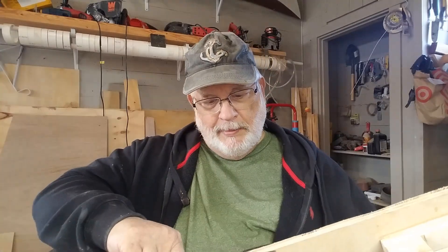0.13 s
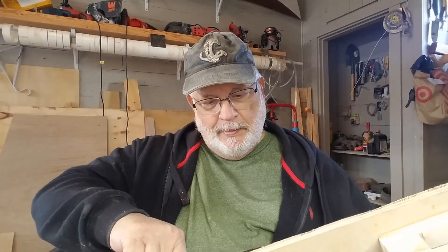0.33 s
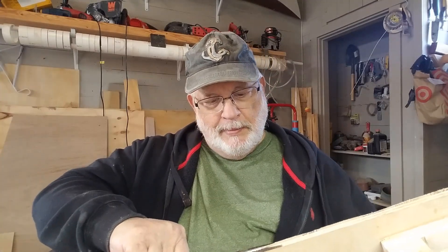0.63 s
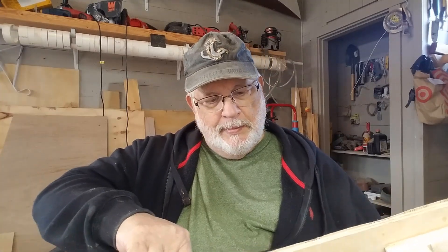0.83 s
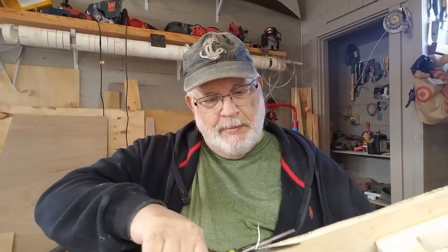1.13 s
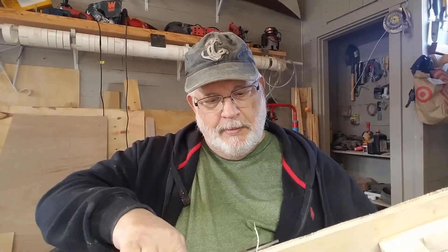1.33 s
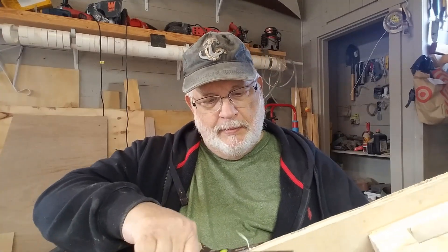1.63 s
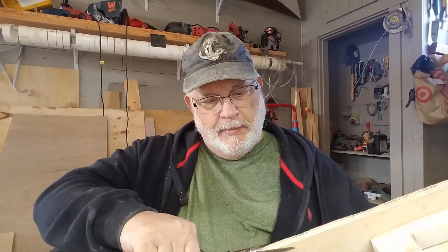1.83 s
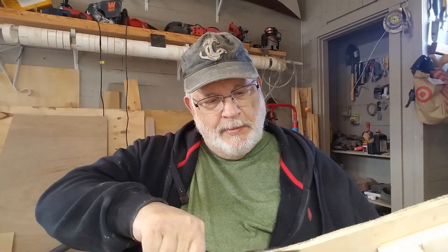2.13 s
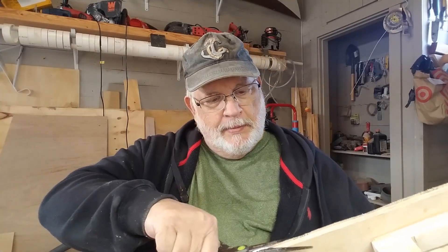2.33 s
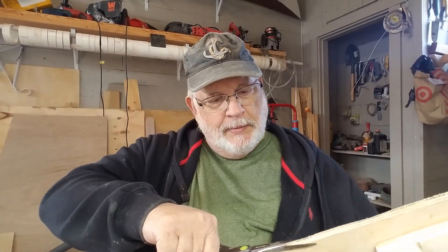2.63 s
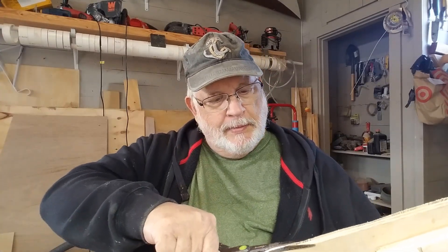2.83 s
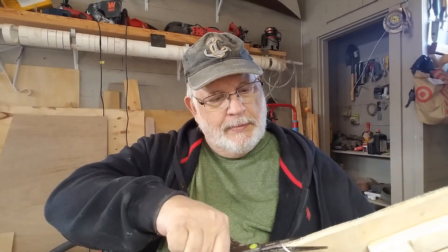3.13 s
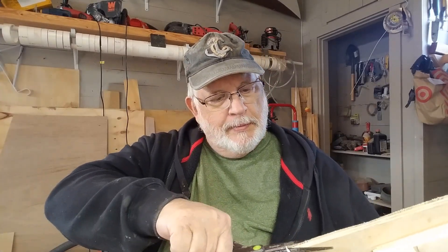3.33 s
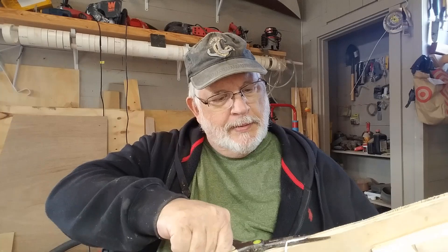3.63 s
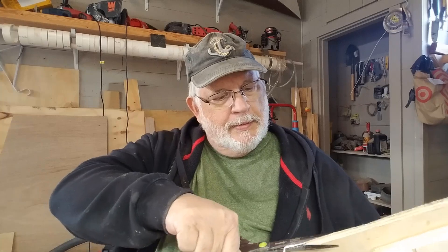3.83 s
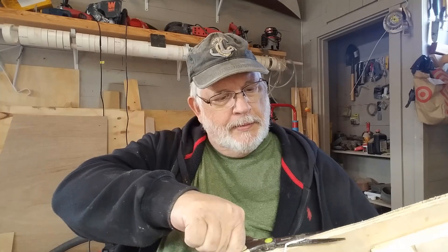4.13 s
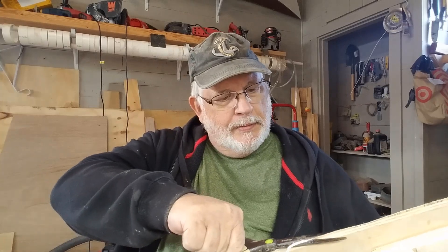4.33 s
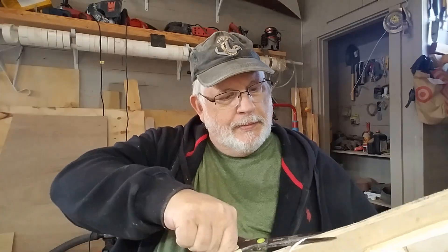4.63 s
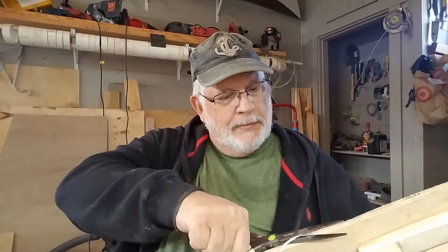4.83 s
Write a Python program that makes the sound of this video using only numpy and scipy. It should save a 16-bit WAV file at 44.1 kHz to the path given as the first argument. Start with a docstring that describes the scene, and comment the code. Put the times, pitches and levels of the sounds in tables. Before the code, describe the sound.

Scissors trim stiff sandpaper stuck to a wooden board. Sharp, brittle snaps come in irregular clusters, joined by short gritty rasps, tiny ticks and dull wooden knocks. A few steel blade clacks stand out. The cutting starts immediately, thins briefly, then turns denser and louder. Close stereo microphones in a small workshop catch a short, lively room tail over very faint low room air.

```python
"""Scissors cutting sandpaper on wood

Scissors trim the overhang of sandpaper stuck to a wooden board, in a small workshop.
The blades break through the grit in jerks: each snap is a burst of filtered noise for the crack,
and a sudden release that excites the decaying modes of the stiff sheet and of the board.
Between snaps a rain of tiny impulses makes the grinding; small ticks and clacks of steel join in.
Two microphone ports stand close by; the room's decaying noise rings for just under half a second."""
import sys
import numpy as np
from scipy import signal
from scipy.fft import rfft, irfft
from scipy.io import wavfile
from scipy.ndimage import uniform_filter1d

SR = 44100
rng = np.random.default_rng(int(sys.argv[2]) if len(sys.argv) > 2 else 0)


def wrap_up_sound(samples):
    """Save the sound to the file named by the first command line argument, as 16-bit audio."""
    columns = np.atleast_2d(samples).T
    # keep every value between -1 and 1, then stretch to whole-number steps
    tamed = np.clip(columns, -1, 1)
    steps = np.round(tamed * 32767).astype(np.int16)
    wavfile.write(sys.argv[1], SR, steps)


N = 219110  # samples


def amp(db):
    """Decibel law: the amplitude factor of a level in dB."""
    return 10 ** (np.asarray(db) / 20)


def read(points, hz):
    """Logarithmic frequency scale: straight lines between points on that axis."""
    f, value = np.transpose(points)
    return np.interp(np.log(hz + 1), np.log(f + 1), value)


def unit(x):
    """Energy normalisation: scales a sound to a mean energy of one per channel."""
    return x / np.sqrt(np.mean(np.sum(x ** 2, -1)) + 1e-20)


def add(mix, s, sound):
    """Superposition: mixes a two-channel sound in at time s, trimmed to the mix."""
    start = round(s * SR)
    sound = sound[:, max(-start, 0):]
    part = mix[:, max(start, 0):][:, :sound.shape[1]]
    part += sound[:, :part.shape[1]]


def play(events):
    """Superposition of events, each a time in seconds and its (delay s, sound) parts."""
    out = np.zeros((2, N))
    for s, parts in events:
        for delay, sound in parts:
            add(out, s + delay, sound)
    return out


def through(x, response):
    """Linear filtering: convolves an excitation with an impulse response."""
    return signal.fftconvolve(np.atleast_2d(x), np.atleast_2d(response), axes=1)


def colour(db_at, size=512):
    """Minimum phase: the causal impulse response that follows from the gain db_at(Hz)."""
    hz = abs(np.fft.fftfreq(size, 1 / SR))
    log_gain = np.log(amp(db_at(hz)))
    spectrum = np.exp(np.conj(signal.hilbert(log_gain)))
    return np.fft.ifft(spectrum).real[..., :size // 2]


def ring(modes, size=4096):
    """Modal synthesis: a sum of exponentially dying sines, given as (Hz, dB, t60 s)."""
    t = np.arange(size) / SR
    return sum(amp(db - 60 * t / max(t60, .001)) * np.sin(2 * np.pi * hz * t) for hz, db, t60 in modes)


def ports(x, shared):
    """Partial correlation: two unrelated signals become a pair with a shared part."""
    shared = np.clip(shared, 0, 1)
    return np.array([x[0], shared * x[0] + np.sqrt(1 - shared ** 2) * x[1]])


# Spectrum of the still room. Each row: frequency in Hz, relative density in dB per Hz.
STILL_AIR = [(20, 0.5), (64, -0.5), (108, 0.5), (200, -3.5), (400, -7.5), (1200, -16), (4000, -27),
             (15000, -25.5)]


def air(level_db=-62.5):
    """Shaped noise: the faint, low, stationary sound of the still room."""
    hz = np.fft.rfftfreq(N, 1 / SR)
    white = ports(rng.standard_normal((2, N)), shared=0.84)
    noise = irfft(rfft(white) * amp(read(STILL_AIR, hz)), N)
    return amp(level_db) * np.sqrt(N) * unit(noise)


# Late decay of the room. Each row: frequency in Hz, time to fall by 60 dB in s.
ROOM_DECAY = [(150, 0.46), (400, 0.3), (1000, 0.44), (2800, 0.4), (7000, 0.36), (15000, 0.26)]
# Strength of the reflections. Each row: frequency in Hz, level in dB against the direct sound.
ROOM_STRENGTH = [(100, -1), (400, -4.5), (1000, -5.5), (2500, -2), (7000, -3), (15000, -2)]


def workshop(x, first=0.0017, early_db=3, early_time=0.0088, apart_hz=1300):
    """Diffuse reverberation: dense reflections from bench and walls as dying noise.

    The close ports hear the same bass but different treble, parting around apart_hz."""
    size = SR * 3 // 4
    hz, t, noise = signal.stft(rng.standard_normal((3, 2, size)), SR, nperseg=256)
    shared = 1 / (1 + (hz[:, None] / apart_hz) ** 2)
    t60 = read(ROOM_DECAY, hz)[:, None]
    decay = amp(-60 * t / t60 + early_db * np.exp(-t / early_time))
    energy = size * np.mean(decay ** 2, 1, keepdims=True)
    decay *= amp(read(ROOM_STRENGTH, hz))[:, None] / np.sqrt(energy)
    # reflections fade in around the first delay (s)
    onset = np.clip(np.arange(size) / (first * SR) - .5, 0, 1)
    out = np.zeros((2, N))
    for k, pair in enumerate(noise):
        tail = signal.istft(ports(pair, shared) * decay, SR, nperseg=256)[1][:, :size] * onset
        # the reflections change as hand and scissors move: three tails trade places every 2 s
        turns = np.arange(N) / SR / 2 + k / 3
        place = np.sqrt(2 / 3) * np.cos(2 * np.pi * turns)
        out += through(x * place, tail)[:, :N]
    return out


# Spectrum of breaking grit. Each row: frequency in Hz, relative density in dB per Hz.
GRIT_SPECTRUM = [(300, -41), (900, -5.5), (1500, 3.5), (2400, 6.5), (3500, 2.5), (5500, 0), (7500, 2.5),
                 (9300, -5), (11000, -3.5), (13500, -2.5), (15700, -0.5), (16300, -30)]
# Balance of the grit between the ports. Each row: frequency in Hz, left minus right in dB.
GRIT_PORT_BALANCE = [(1000, -8.5), (2500, 1.5), (4000, 1), (6000, 3.5), (8300, -1), (10000, -4), (13000, 0),
                     (16000, 3)]


def grit_response(tilt_db, hz, hump_db=5.5, octaves=0.29):
    """Brittle fracture: short, bright sound of a grain at the two ports.

    The spectrum tilts by tilt_db per octave, with a broad hump (or dip) of hump_db around hz."""
    def gain_db(f):
        slope = tilt_db * np.log2(np.clip(f, 1500, 10000) / 5000)
        hump = hump_db * np.exp(-(np.log2((f + 1) / hz) / octaves) ** 2)
        balance = np.outer([.5, -.5], read(GRIT_PORT_BALANCE, f))
        return read(GRIT_SPECTRUM, f) + slope + hump + balance
    return colour(gain_db)


# Modes of the hand-damped steel blades. Each row: frequency in Hz, relative level in dB, t60 in s.
BLADE_MODES = [(903.7, -16, 0.058), (1177, -15, 0.013), (1510, -31, 0.078)]


def sheet_response(hz, cycles=10, blades_db=0, low_cut_hz=600):
    """Damped flexural mode: the free flap falls by 60 dB in a few cycles, beside the blades' modes.

    It is too small to radiate bass, hence the high-pass filter."""
    flap = ring([(hz, 0, cycles / hz)])
    modes = flap + amp(blades_db) * ring(BLADE_MODES)
    return signal.lfilter(*signal.butter(2, low_cut_hz, "high", fs=SR), modes)


# Modes of the board under the sheet. Each row: frequency in Hz, relative level in dB, t60 in s.
BOARD_MODES = [(219.7, -3, 0.047), (271, -17, 0.045), (356, -29.5, 0.087), (420, -5.5, 0.055),
               (483.4, -12.5, 0.13), (602, -15, 0.18), (630, -5.5, 0.023)]


def board_response(hz, t60=0.028, reach=0.15, far_db=6, low_cut_hz=330, top_hz=1100):
    """Modal excitation: the wood knocks at hz, set by the place of the cut.

    Modes near that pitch answer most; from reach (octaves) on they are far_db weaker."""
    modes = [(hz, 0, t60)]
    for f, db, ring_s in BOARD_MODES:
        distance = min(abs(np.log2(f / hz)) / reach, 1)
        modes.append((f, db - far_db * distance, ring_s))
    band = signal.butter(2, [low_cut_hz, top_hz], "band", fs=SR, output="sos")
    return signal.sosfilt(band, ring(modes))


# Pitch of the free flap as the cut moves on. Each row: time in s, frequency in Hz.
FLAP_PITCH = [(0, 1020), (0.64, 1160), (0.95, 1283), (1.9, 1153), (2.65, 1050), (2.72, 1350), (2.87, 1420),
              (3.1, 870), (3.65, 830), (4.5, 846), (4.95, 920)]
# Pitch of the board's knock at the place of the cut. Each row: time in s, frequency in Hz.
KNOCK_PITCH = [(0, 400), (0.6, 450), (0.95, 370), (1.2, 433), (1.67, 395), (1.82, 420), (1.92, 482),
               (2.65, 537), (2.82, 516), (3.5, 620), (3.72, 472), (4.3, 587), (4.95, 460)]
# Centre of the crack's hump. Each row: time in s, frequency in Hz.
CRACK_PITCH = [(0, 11300), (0.95, 12500), (1.2, 2740), (2.0, 3500), (2.26, 8700), (2.56, 3520),
               (2.81, 3530), (2.86, 13000), (3.38, 3000), (3.52, 3560), (3.55, 5500), (4.44, 5890),
               (4.9, 12600)]


def pitches(s):
    """Position-dependent resonance: pitches in Hz of flap, board and crack at time s."""
    return [np.interp(s, *np.transpose(curve)) for curve in (FLAP_PITCH, KNOCK_PITCH, CRACK_PITCH)]


# Grinding through grit and rubbing on the sheet.
# Each row: start in s, end in s, grit level in dB, board level in dB (both RMS over the stroke).
GRINDING = [(0.115, 0.16, -46, -54), (0.373, 0.469, -46, -55.5), (0.543, 0.696, -50.5, -53.5),
            (0.755, 0.88, -55.5, -55.5), (0.861, 0.97, -39.5, -45.5), (0.977, 1.05, -72, -52.5),
            (1.154, 1.299, -52.5, -52), (1.386, 1.509, -48, -50.5), (1.549, 1.608, -50, -58),
            (1.627, 1.678, -41.5, -42.5), (1.802, 1.833, -34.5, -44.5), (1.82, 1.99, -46, -51),
            (1.871, 1.924, -31, -44), (1.999, 2.032, -31.5, -45.5), (2.137, 2.205, -46.5, -49.5),
            (2.233, 2.286, -42, -45), (2.482, 2.497, -49, -52.5), (2.551, 2.63, -54, -69),
            (2.636, 2.672, -28.5, -34), (2.686, 2.75, -42, -44), (2.803, 2.912, -42, -55),
            (2.983, 3.066, -51.5, -52), (3.088, 3.154, -43.5, -47), (3.323, 3.389, -52, -56.5),
            (3.397, 3.468, -44.5, -42), (3.454, 3.638, -46, -47), (3.764, 3.807, -36.5, -40.5),
            (3.847, 3.928, -47.5, -52), (4.173, 4.237, -47.5, -47.5), (4.358, 4.466, -38.5, -47),
            (4.552, 4.616, -45.5, -50.5), (4.67, 4.725, -33, -34.5), (4.71, 4.806, -42, -49)]
SHEET_UNDER_DB, SHEET_FROM_BOARD = 0.5, 0.3  # sheet level: 0.3 of the way from grit to board, plus 0.5 dB


def strokes(grains_per_s=2200, spread_db=3.5, clump_db=4.0, attack_s=0.0086, release_s=0.015,
            dull_db=-1.8, brighten=.15, soft_db=-43, ease_db=12, sheet_hz=1200, slack=0.928):
    """Stick-slip friction: a dense, uneven rain of tiny fractures excites grit, sheet and board."""
    out = np.zeros((2, N))
    struck = rng.exponential(1, N)
    sizes = amp(spread_db * np.minimum(struck, 4)) * (rng.random(N) < grains_per_s / SR)
    # the blade sticks and slips, so the grains come in clumps of a few milliseconds
    slip = uniform_filter1d(rng.standard_normal(N), size=160)
    clumps = amp(clump_db * np.clip(slip / slip.std(), -2, 2))
    grains = sizes * clumps * rng.standard_normal((2, N))
    sheet = sheet_response(sheet_hz, cycles=3.9, blades_db=-2)
    for start, end, grit_db, board_db in GRINDING:
        first = max(round(start * SR), 0)
        last = min(round(max(end, start + .01) * SR), N)
        t = np.arange(first, last)
        # the lighter the touch, the more gently it starts and stops
        gentle = 1 + max(soft_db - grit_db, 0) / ease_db
        ramps = np.minimum((t - t[0]) / attack_s, (t[-1] - t) / release_s)
        press = np.clip(ramps / (SR * gentle), 0, 1)
        # the less the blades lean on the board, the brighter they grind
        tilt_db = dull_db + brighten * (grit_db - board_db)
        grit = grit_response(tilt_db, hz=6600, hump_db=-3.0)
        # rubbing leaves the board slacker and deeper than a hard bite does
        knock_hz = slack * pitches((start + end) / 2)[1]
        board = board_response(knock_hz, t60=0.028, low_cut_hz=225)
        sheet_db = grit_db + SHEET_FROM_BOARD * (board_db - grit_db) + SHEET_UNDER_DB
        for response, shared, db in [(grit, .4, grit_db), (sheet, .75, sheet_db), (board, .97, board_db)]:
            sound = through(ports(grains[:, t] * press, shared), response)
            add(out, t[0] / SR, amp(db) * np.sqrt(len(t)) * unit(sound))
    return out


def ticks(length=0.0003, crack_db=23, sheet_db=17, board_db=22, tilt_spread_db=2.5, count=170):
    """Random fracture: small snaps at chance times, heard only within strokes.

    Their energies follow the stroke's levels, offset by the given dB."""
    events = []
    times = (np.arange(count) + rng.random(count)) * N / SR / count
    tilts = tilt_spread_db * rng.standard_normal(count)
    for s, tilt in zip(times, tilts):
        for start, end, grit, board in GRINDING:
            if start < s < end:
                levels = grit + crack_db, tilt, grit + sheet_db, board + board_db
                events.append((s, snap(length, *levels, *pitches(s))))
    return play(events)


# The steel blades clack together, levels as energies.
# Each row: time in s, build-up time in s, click in dB, click tilt in dB per octave, ring in dB.
BLADE_CLACKS = [(0.8544, 0.0024, -8.5, 5, -4.5), (2.2366, 0.001, 0, -7, -6.5), (2.851, 0.00037, 1.5, 6, -4),
                (4.14, .0007, -4.5, -0.5, -19), (4.6703, 0.00057, -0.5, 3, -0.5)]
CLACK_HZ, CLACK_BOARD_DB = 2050, -17.5  # ring pitch before scatter, board energy


def clacks():
    """Impact of steel on steel: a short click with much the same ring, which hardly moves the board."""
    return play((s, snap(*row, CLACK_BOARD_DB, CLACK_HZ, *pitches(s)[1:])) for s, *row in BLADE_CLACKS)


def snap(length, crack_db, tilt_db, sheet_db, board_db, sheet_hz, knock_hz, crack_hz, scatter=0.028,
         rise=1.0, fall=2.34, crumble=0.099, give=0.0014, cut_ratio=0.71, size=1024):
    """Impulsive release: a quick cluster of breaking grains and one sudden unloading of the blade.

    Returns (delay s, sound) for grit, sheet and board."""
    t = (np.arange(size) - size // 4) / SR
    # the breaking builds up quickly and dies away a little more slowly
    time_constant = max(length, .0003) * np.where(t < 0, rise, fall)
    swell = np.exp(-abs(t) / time_constant)
    grains = swell * rng.standard_normal((4, size))
    release = (t == 0) + crumble * grains[2:]
    # no two snaps have quite the same pitches
    centres = np.array([sheet_hz, knock_hz, crack_hz])
    sheet_hz, knock_hz, crack_hz = centres * np.exp(scatter * rng.standard_normal(3))
    crack = through(ports(grains[:2], shared=0.26), grit_response(tilt_db, crack_hz, hump_db=3))
    flap = through(release, sheet_response(sheet_hz, cycles=11.8))
    wood = board_response(knock_hz, far_db=7.5, low_cut_hz=cut_ratio * knock_hz)
    knock = through(release[[1, 1]], wood)  # the same at both ports
    return [(t[0], amp(crack_db) * unit(crack)),
            (t[0], amp(sheet_db) * unit(flap)),
            # the board starts to spring back as the first grains give
            (t[0] - give, amp(board_db) * unit(knock))]


# The blades jerk through the sheet, levels as energies.
# Each row: time in s, build-up time in s, crack in dB, crack tilt in dB per octave,
# sheet in dB, board in dB.
CUT_SNAPS = [(0.0024, 0.0015, -4, -4, 1, -0.5), (0.036, 0.0024, -11.5, -1, -14, -14),
             (0.138, .0018, -14.5, -1.5, -22.5, -37), (0.2039, 0.00081, -12.5, -0.5, -20, -25),
             (0.37, 0.001, -18, -3.5, -30, -37), (0.4415, 0.0051, -8.5, 0.5, -14, -8),
             (0.453, .0016, -12, 0, -18, -30), (0.5165, 0.0014, -5, -3, -1.5, -11),
             (0.542, 0.0014, 0, -1.5, 1, 2.5), (0.616, 0.0011, -14.5, 0, -7, -6),
             (0.6384, 0.00078, -1.5, -2, 7, -10), (0.784, 0.00064, -11, -7.5, -29, -18.5),
             (0.8916, 0.0056, -2, -3, -4, -6.5), (0.934, 0.0017, -7, 0, -10.5, -27),
             (0.9454, .0003, -12, 14, -27, -12), (0.961, 0.0016, -12.5, -4, -13, -7.5),
             (1.1885, 0.00093, -19.5, -10, -32, -17), (1.234, .0026, -18.5, 2.5, -18, -42),
             (1.255, 0.0012, -20, -5, -17.5, -42), (1.4085, 0.0013, -14.5, -21, -21, -16),
             (1.428, 0.0067, -11, -9.5, -19, -32), (1.499, 0.0016, -20, -8, -14.5, -16),
             (1.597, 0.0028, -11.5, -2.5, -19, -14), (1.64, 0.0014, -12, 0, -14, -13),
             (1.667, 0.00066, -9.5, 1.5, -22, -9), (1.724, 0.0021, -1.5, 2, -14, -5.5),
             (1.802, 0.0026, -8, 1.5, -14, -23), (1.818, 0.00074, 0, 1.5, -1.5, 0.5),
             (1.8852, 0.0016, .5, 2, -3.5, -4), (1.8922, 0.0024, 2.5, -1.5, 3, -1.5),
             (1.899, 0.00027, -8, -2, -16, 5), (1.921, .0003, -20, 4, -3, -10),
             (1.9531, .0003, -13, 1, -4, -9), (1.9981, 0.0018, -1, 2, 5.5, 2.5),
             (2.0144, 0.0025, -6.5, -2.5, -2, -5), (2.148, 0.0012, -18, -7, -32, -24),
             (2.2658, .0005, -2.5, 8, -24, -35), (2.279, 0.00079, -8.5, 4, -15, -23),
             (2.4792, .0006, -17.5, 5.5, -33, -28), (2.5605, .0005, -17.5, -3, -24.5, -22),
             (2.5685, 0.00049, -10, -0.5, -22, -16.5), (2.605, 0.00031, -16, 10, -35, -30),
             (2.6332, 0.00046, -4.5, 2, -22, -26), (2.6447, 0.00062, 0, 2.5, 3, 5.5),
             (2.653, .0011, -7, 1, -5, -19), (2.7218, 0.00057, 2, 1, -1, -1),
             (2.805, 0.00075, -7.5, 5, -8, -10), (2.8193, 0.0011, 3, 0, 1.5, -2.5),
             (2.8668, .0009, 1, 1.5, 1, -8), (3.0264, 0.00077, -20, -15, -20, -14.5),
             (3.1228, 0.0052, -9.5, -4.5, -9, -13), (3.3223, 0.00055, -15, 0.5, -24, -18.5),
             (3.336, .0011, -9, 3, -16.5, -37), (3.387, .0005, -15, 3.5, -16, -17),
             (3.4024, .0012, -5.5, -1, -14, -7), (3.4114, 0.0013, -5.5, 3.5, -1.5, -6),
             (3.487, 0.0014, -8, 3, -5, -6), (3.504, .0008, -14, -4, -5.5, -10),
             (3.5163, 0.00087, 2.5, 1.5, -0.5, -5), (3.537, 0.0019, -5, 6, 2, -2),
             (3.628, 0.0021, -1, 3.5, 4, -6), (3.6802, 0.0028, -12.5, -10, -9.5, -2.5),
             (3.7713, 0.0014, -6.5, -5, -21, -3.5), (3.8763, 0.00092, -16, -2, -9.5, -33),
             (4.0746, 0.0007, -21, 3.5, -30, -37), (4.1156, 0.0015, -10.5, -1, -16, -22),
             (4.175, 0.00064, -6.5, -3.5, -9.5, -33), (4.2977, 0.0005, -5.5, 4.5, -0.5, 0),
             (4.331, 0.0012, -7, 4.5, -33, -25), (4.3708, 0.00036, 3.5, 6.5, -6.5, -7),
             (4.423, 0.00047, -3, 6, -14, -30), (4.44, 0.0012, -6.5, 2, -7, -24),
             (4.5608, 0.00046, -3.5, -5.5, -8.5, -14.5), (4.6908, .0006, -0.5, 3, -0.5, -4.5),
             (4.7035, 0.00094, -2.5, -8, -3.5, -24), (4.72, 0.00038, -2.5, -5, -9, -4),
             (4.7637, 0.00025, -5.5, 0, -9, -29), (4.919, 0.00027, -11.5, -0.5, -18, -17.5)]


def snaps():
    """Sudden fracture: the big jerks of the cut, pitched by the place where they happen."""
    return play((s, snap(*row, *pitches(s))) for s, *row in CUT_SNAPS)


PORT_LAG = 8  # samples by which the direct sound reaches the right port later


def scene(left_db=0.3):
    """Direct and reverberant fields: the cut, heard directly and through the room, over still air."""
    still = air()
    cut = snaps() + clacks() + strokes() + ticks()
    cut = cut * amp([[left_db], [-left_db]])
    # the scissors are nearer to the left port
    late_right = np.pad(cut[1], (PORT_LAG, 0))[:N]
    direct = np.array([cut[0], late_right])
    return direct + workshop(cut) + still


EDGE_HZ = 16700


def record(dry):
    """Band limitation: a linear-phase low-pass filter with its edge at EDGE_HZ."""
    low_pass = signal.firwin(511, EDGE_HZ, window=("kaiser", 9), fs=SR)
    return signal.oaconvolve(dry, low_pass[None], "same")


dry = scene()
out = record(dry)
wrap_up_sound(out)
```